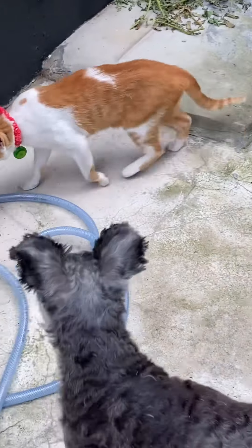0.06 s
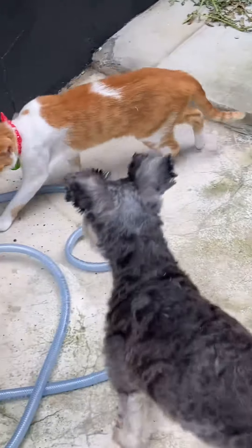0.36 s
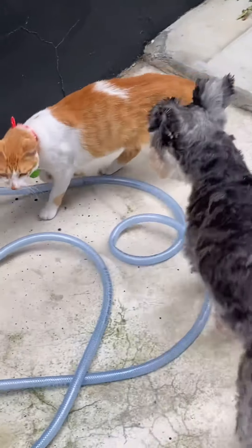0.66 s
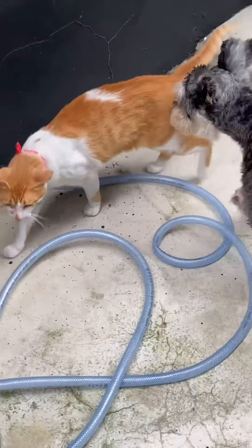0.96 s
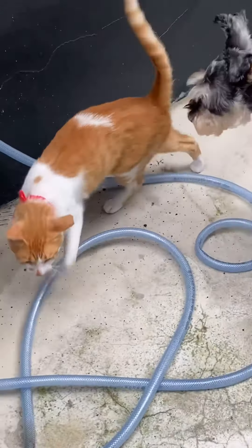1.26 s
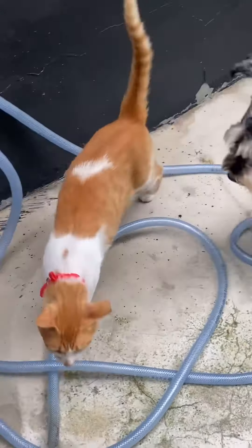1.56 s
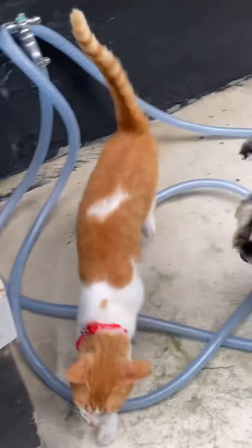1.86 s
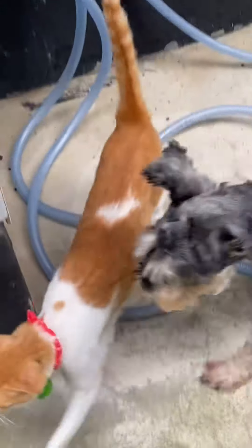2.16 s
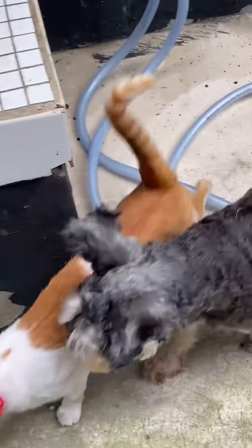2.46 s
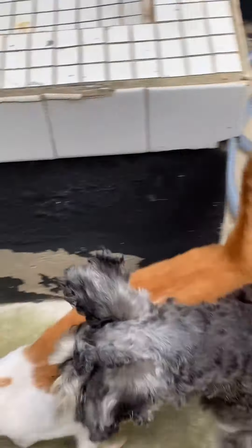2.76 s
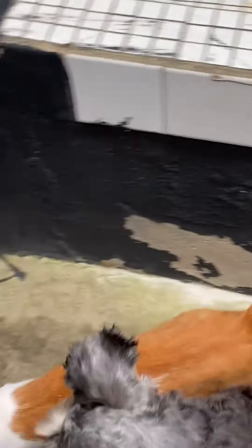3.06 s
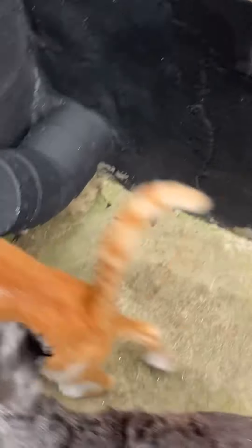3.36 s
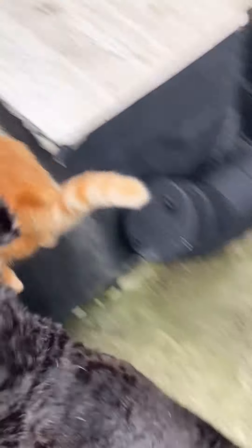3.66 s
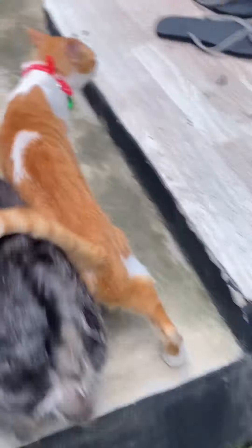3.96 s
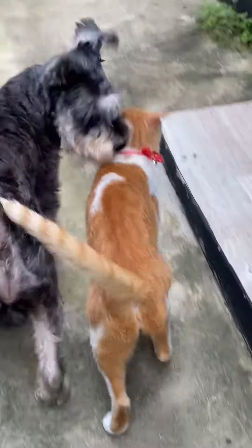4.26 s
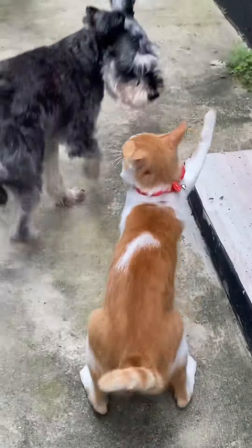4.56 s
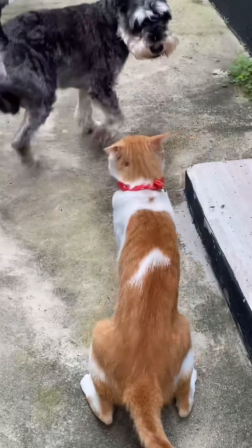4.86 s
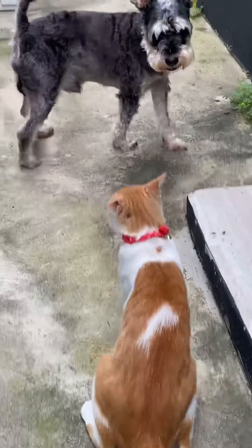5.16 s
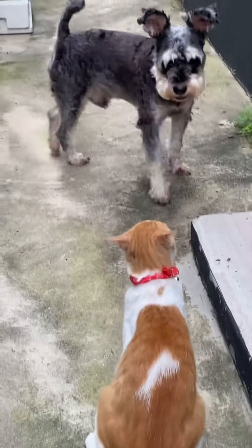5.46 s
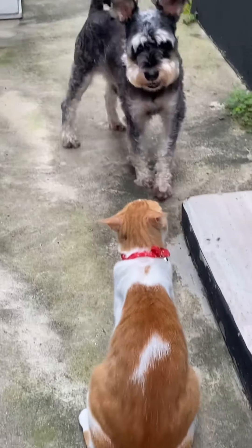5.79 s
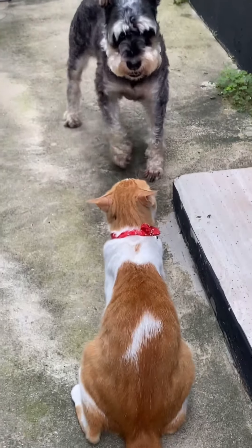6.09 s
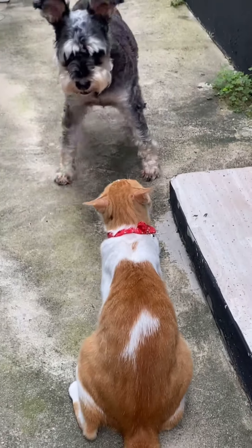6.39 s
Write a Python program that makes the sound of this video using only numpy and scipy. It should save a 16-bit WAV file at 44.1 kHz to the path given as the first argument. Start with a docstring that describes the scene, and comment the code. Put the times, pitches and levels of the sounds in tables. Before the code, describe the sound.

Over a low outdoor rumble and hum, claws tick, paws scuff and a collar bell tinkles faintly as a cat and dog tussle.

```python
"""Cat and dog scuffling in a yard

A cat with a collar bell and a small dog scuffle in a walled concrete yard. Impacts make the claws tick,
the bell tinkle and a garden hose knock; stick-slip friction makes the paws scuff, the hose drag and
something scrape sharply once as the dog shoves the cat along. The walls return a short reverberation.
A bird chirps once, and under it all lie a low rumble, a machine's hum and the outdoor air."""
import sys
import numpy as np
from scipy import signal
from scipy.fft import rfft, irfft, next_fast_len
from scipy.io import wavfile

SR = 44100
rng = np.random.default_rng(int(sys.argv[2]) if len(sys.argv) > 2 else 0)


def wrap_up_sound(samples):
    """Save the sound to the file named by the first command line argument, as 16-bit audio."""
    columns = np.atleast_2d(samples).T
    # keep every value between -1 and 1, then stretch to whole-number steps
    tamed = np.clip(columns, -1, 1)
    steps = np.round(tamed * 32767).astype(np.int16)
    wavfile.write(sys.argv[1], SR, steps)


N = 292378
TIME = np.arange(N) / SR
SIZE = next_fast_len(N, real=True)
FREQS = np.maximum(np.arange(SIZE // 2 + 1) * SR / SIZE, 1)

# Levels in all tables are relative: each source applies its own gain.
# sharp ticks on concrete, mostly claws, also the hose's knock and snaps in the scrape:
# start_s, tick_db, midrange_db
TICKS = [(0.2088, -34, -65), (0.46, -49, -54), (0.4713, -40.5, -49), (0.5015, -44.5, -48.5),
         (0.7377, -34.5, -61), (0.976, -43.5, -63), (1.019, -31, -48), (1.316, -42, -65),
         (1.603, -37, -40.5), (2.174, -32, -49), (2.53, -33.5, -48), (2.707, -43.5, -50), (2.811, -35, -41),
         (2.8238, -30, -39), (3.1646, -40.5, -54), (3.304, -49, -61), (3.5378, -38, -54), (3.909, -49, -52),
         (4.0375, -38.5, -71), (4.142, -49, -57), (4.4764, -28, -75), (4.6096, -28.5, -65),
         (4.6225, -37, -61), (4.6491, -43, -48), (4.999, -48, -60), (5.1429, -38.5, -64),
         (5.1752, -44, -54), (5.4973, -43.5, -46), (5.8363, -52, -56), (5.9852, -35.5, -54),
         (6.3876, -42, -48), (6.4746, -46, -51.5), (6.5226, -54, -51.5)]
# pellet strikes on the bell, each damped differently by fur: start_s, level_db, t60_s, upper_mode_db
BELL_STRIKES = [(.881, -53, .11, 3), (.92, -53, .08, 9), (.93, -52, .11, 8), (.948, -59, .14, 3),
                (.971, -56, .13, -6), (.995, -59, .15, 2), (1.07, -64, .15, 5), (2.931, -42, .07, -12),
                (3.056, -53, .13, -1), (3.183, -48, .07, -1), (3.278, -61, .1, -8), (3.359, -50, .11, -12),
                (3.368, -45.5, .12, -1), (3.4915, -33.5, .045, -10), (3.506, -50, .09, 5),
                (3.533, -54, .1, -6), (3.554, -44, .1, -6), (3.574, -47, .07, -9), (3.598, -53, .09, -12),
                (4.254, -54, .05, -8), (4.261, -48, .08, 0), (4.31, -49, .09, -20), (4.354, -51, .1, 1),
                (4.364, -44, .07, 1), (4.397, -56, .12, -8), (4.765, -51, .11, -10), (4.785, -53, .1, -5),
                (4.822, -38, .055, -24), (4.845, -49, .09, -24)]
# normal modes of the bell's shell: pitch_hz, level_db
BELL_MODES = [(5772, 0), (5880, -18), (6060, -22), (14298, 0)]


def ticks(tick_gain_db=8, tap_gain_db=18, rebound_s=0.0021, crush_s=.0013, crumble_s=.007):
    """Hard impact: a brief contact, mostly of a claw, ticks, rebounds and crumbles a grain."""
    # spectrum of the impacts: frequency_hz, gain_db
    spectrum = [(6000, 0), (9500, 0), (12500, -2), (15500, -2)]

    def contact(rows):
        hits = strikes(rows, spread_db=.5)
        rebound = from_db(-13) * np.interp(TIME - rebound_s, TIME, hits)
        crush, crumble = (signal.lfilter([1], [1, -np.exp(-1 / (decay_s * SR))], hits + 1e-18)
                          for decay_s in (crush_s, crumble_s))
        grains = grit(12000, spread_db=2.5)
        return hits + rebound + grains * (from_db(-8) * crush + from_db(-27) * crumble)
    tick = cut(contact([(s, db) for s, db, _ in TICKS]), hz=5800, kind="high")
    # heavier contacts add mid-range
    tap = resonate(contact([(s, db) for s, _, db in TICKS]), [(5330, 5100, 0)])
    return colour(from_db(tick_gain_db) * tick + from_db(tap_gain_db) * tap, spectrum)


def scuffs(slide_s=0.019, slide_db=-22, clump_db=1.0):
    """Sliding friction: grit is pushed along in clumps, faintly after each tick, more in a scuff."""
    # short gritty scuffs of paws and, twice, of the hose: start_s, rise_s, length_s, fine_db, coarse_db
    skids = [(0.256, .002, 0.028, -51.5, -69), (0.774, .004, 0.032, -54, -62),
             (1.835, 0.0022, 0.068, -56.5, -62), (1.962, .002, 0.067, -54.5, -59),
             (2.443, .002, 0.034, -60, -65), (2.762, 0.0024, 0.0098, -48, -43),
             (2.907, .01, 0.062, -57, -54.5), (2.982, 0.0013, 0.011, -49.5, -57),
             (3.324, .004, 0.039, -62, -66), (3.465, .008, 0.069, -60, -73),
             (3.571, .002, 0.0093, -52, -49), (3.604, .006, 0.03, -54, -65),
             (3.772, 0.0096, 0.029, -48.5, -55), (4.109, 0.0022, 0.015, -57, -56),
             (4.18, .002, .01, -58, -70), (4.367, 0.0045, 0.016, -50, -59),
             (4.777, 0.0027, 0.034, -51.5, -60), (4.938, 0.00094, 0.0072, -62, -51),
             (4.948, 0.026, 0.079, -58, -64), (5.018, 0.016, 0.022, -50, -50),
             (5.4955, 0.0017, 0.0082, -52.5, -50), (5.84, .001, 0.0063, -65, -61)]
    sand_spectrum = [(500, -22), (2000, 2.5), (4500, 3.5), (9500, 4.5), (15000, -4.5)]
    sand = rms_one(colour(grit(5000, spread_db=2.5), sand_spectrum))
    gravel = rms_one(resonate(grit(5000, spread_db=2.5), [(3640, 1360, 0.16), (5930, 2300, 2)]))
    fine = strokes([(s, slide_s, db + slide_db) for s, db, _ in TICKS], rise_s=0.0015)
    coarse = np.zeros(N)
    for s, rise, length, fine_db, coarse_db in skids:
        push = strokes([(s, length, 0)], rise_s=rise)
        fine += from_db(fine_db) * push
        coarse += from_db(coarse_db) * push
    return (sand * fine + gravel * coarse) * from_db(clump_db * drift(90))


def bell(rise_s=0.0006, detune_hz=8, upper_t60_ratio=1.1, flicker_db=-0.8):
    """Modal vibration: each strike rings the shell's damped modes, the highest lasting longest."""
    age = np.arange(SR // 4) / SR
    out = np.zeros(N + len(age))
    for s, db, t60, upper_db in BELL_STRIKES:
        start = int(s * SR)
        for hz, mode_db in BELL_MODES:
            is_upper = hz > 2 * BELL_MODES[0][0]
            decay = from_db(-60 * age / (t60 * upper_t60_ratio ** is_upper))
            envelope = from_db(db + mode_db + upper_db * is_upper) * (1 - np.exp(-age / rise_s)) * decay
            pitch = hz + detune_hz * rng.standard_normal()
            out[start:start + len(age)] += envelope * np.sin(2 * np.pi * pitch * age)
    return out[:N] * from_db(flicker_db * drift(60))


def pellet(clatter_s=0.016, clatter_db=-17, tumble_db=-17, t60_share=0.2):
    """Repeated impacts: after a strike the pellet rolls on, clattering and keeping the shell ringing."""
    clatter = rms_one(resonate(grit(4300, spread_db=-1), [(7900, 2000, 0.77), (10300, 690, -1.8)]))
    shell = [(BELL_MODES[0][0], 60, 0), (BELL_MODES[-1][0], 70, 2)]
    shimmer = rms_one(resonate(grit(700, spread_db=2), shell))
    rolls = [(s, clatter_s, db + clatter_db) for s, db, _, _ in BELL_STRIKES]
    tumbles = [(s, t60_share * t60, db + tumble_db) for s, db, t60, _ in BELL_STRIKES]
    return clatter * strokes(rolls, rise_s=0.0013) + shimmer * strokes(tumbles, rise_s=.004)


def scrape(rise_s=0.0023, catch_s=0.0087, run_out_s=0.066, run_out_db=-18.5, wander_share=.008):
    """Stick-slip friction: a hard skid catches, excites shifting resonances and dulls as it runs out."""
    # catches of the skid: start_s, level_db
    catches = [(2.792, -34), (2.7992, -29.5), (2.8088, -24), (2.8237, -33.5)]
    # spectrum of the friction noise: frequency_hz, density_db
    spectrum = [(200, -0.5), (350, -3), (600, -5), (950, -6), (1230, -10), (1600, -9), (2150, -3),
                (2900, -6.5), (4000, -8.5), (5000, -14), (5800, -14), (7000, -7), (10000, -21),
                (15000, -28)]
    # resonances of the thing that skids: centre_hz, width_hz, gain_db
    body = [(1450, 117, 2.5), (1840, 46, 0), (2210, 220, 5), (2540, 120, 2), (2780, 210, 4.5),
            (3220, 80, 0), (4020, 310, -3), (5550, 200, -7)]
    grip = strokes([(s, catch_s, db) for s, db in catches], rise_s)
    run_out = strokes([(s, run_out_s, db + run_out_db) for s, db in catches], rise_s)
    broad = rms_one(cut(colour(grit(6000, spread_db=2), spectrum), hz=149, kind="high"))
    dull = cut(broad, hz=4500, kind="low", order=1)
    ringing = rms_one(wander(resonate(grit(7000, spread_db=3), body), wander_share * drift(25)))
    bite_spectrum = [(700, -12), (2200, 5), (4000, 3), (7000, -18), (15000, -25)]
    bite = rms_one(colour(grit(2500, spread_db=-1), bite_spectrum))
    return (from_db(-2) * (broad * grip + from_db(-3) * dull * run_out)
            + from_db(-4) * ringing * (grip + run_out)
            + from_db(-8) * bite * grip ** 2 / grip.max())  # harshest where it grips hardest


def hose_knocks(gain_db=-3):
    """Impact excitation: the hose hits the ground and its heavily damped modes ring briefly."""
    # impacts on the ground: start_s, level_db
    knocks = [(1.5957, -35), (1.602, -30.5), (1.6055, -34), (1.611, -40), (1.6155, -44), (1.6215, -44),
              (1.624, -43), (1.955, -41), (1.971, -41.5), (1.977, -42), (1.99, -41)]
    # modes of the hose: pitch_hz, level_db, t60_s
    modes = [(2780, -7, .012), (3170, -5, .014), (3330, -1, .017), (3800, -14, .008), (4800, -9, .008),
             (5300, -3, .012)]
    ringing = sum(from_db(db + gain_db) * ring(strikes(knocks, spread_db=3.5), hz, t60)
                  for hz, db, t60 in modes)
    return cut(cut(ringing, hz=2400, kind="high", order=4), hz=4800, kind="low")


def hose_squeaks(gain_db=-1):
    """Stick-slip friction: the hose catches, and bursts of slips drive narrow resonances."""
    # catches of the hose: start_s, length_s, level_db
    catches = [(1.843, 0.011, -45.5), (1.856, 0.011, -49), (1.8665, 0.006, -41.5), (1.875, 0.018, -51)]
    # resonances of the squeak: centre_hz, width_hz, gain_db
    body = [(2050, 100, 4.5), (2740, 99, 2), (3490, 115, 3), (4590, 70, 1), (5800, 80, -5)]
    squeak = rms_one(resonate(grit(3100, spread_db=6.0), body))
    return from_db(gain_db) * squeak * strokes(catches, rise_s=0.00055)


def hose_drag(start_s=1.989, attack_s=0.055, hold_s=0.23, release_s=0.072, level_db=-48.5, jerk_db=-1):
    """Sliding friction: sandy concrete excites the hose, whose resonances shift as it bends."""
    # resonances of the sliding hose: centre_hz, width_hz, gain_db
    body = [(1440, 50, 1.5), (1766, 50, 4), (1910, 50, -2), (2110, 110, 0), (2700, 280, -0.5),
            (3900, 90, -7), (4400, 100, -6), (5450, 360, -18)]
    slips = grit(11000, spread_db=3)
    bending = wander(resonate(slips, body), share=0.0125 * drift(9.26))
    hiss = from_db(-15.5) * cut(slips, hz=1307, kind="high")
    sliding = rms_one(cut(bending + hiss, hz=8900, kind="low"))
    sand = rms_one(resonate(grit(1600, spread_db=4.0), [(3180, 780, 2), (10700, 5200, -2)]))
    pull = ramp(start_s, attack_s) - ramp(start_s + attack_s + hold_s, release_s)
    return from_db(level_db + jerk_db * drift(45)) * pull * (sliding + from_db(-12) * sand)


def puffs():
    """Resonant filtering: three resonances make noise bursts soft and hollow as the dog steps up."""
    # bursts of noise: start_s, length_s, level_db
    bursts = [(5.768, 0.013, -45.5), (5.797, 0.019, -56), (6.028, 0.031, -49.5), (6.044, 0.043, -50)]
    # hollow resonances: centre_hz, width_hz, gain_db
    body = [(720, 82, -1), (1164, 110, -8), (1600, 146, -11.5)]
    return rms_one(resonate(rng.standard_normal(N), body)) * strokes(bursts, rise_s=0.0012)


def rustle(level_db=-69, patchy_db=3):
    """Light friction: fur and loose grit stir faintly all the while."""
    spectrum = [(1000, 14), (3000, 0.89), (5500, 10.5), (9000, 3.8), (15000, 7.5)]
    grains = colour(grit(2500, spread_db=3.5), spectrum)
    return from_db(level_db) * rms_one(grains * from_db(patchy_db * drift(30)))


def yard(x, gain_db=-6, first_wall_s=0.0087, t60_s=.29):
    """Reverberation: reflections from walls and ground merge into an exponentially decaying tail."""
    age = TIME - first_wall_s
    tail = cut(diffuse(), hz=12000, kind="low", order=1) * (age > 0) * from_db(-60 * age / t60_s)
    tail = tail[:, :SR] / np.sqrt(np.sum(tail ** 2) / 2)
    return from_db(gain_db) * signal.fftconvolve(x[None], tail, axes=1)[:, :N]


def bird(crest_s=.196, length_s=0.029, pitch_hz=4610, fall_hz_per_s=3000, level_db=-58):
    """Frequency sweep: a small bird's chirp is one thin falling tone."""
    pitch = pitch_hz - fall_hz_per_s * (TIME - crest_s)
    return from_db(level_db) * swell(crest_s, length_s) * tone(pitch)


def rumble(pitch_hz=57.27, wander_hz=3.506, wander_db=3, boom_db=-45.5, skirt_db=-48):
    """Amplitude and frequency modulation: a deep boom wanders and swells over broader deep noise."""
    # swells of the rumble: crest_s, length_s, rise_db, pitch_shift_hz
    swells = [(0.114, 0.23, 3, 6), (1.765, 0.075, 7.5, -0.5), (2.357, 0.18, 8, -0.5), (2.813, 0.11, 14, -4),
              (3.022, 0.13, 8.5, -1), (3.18, 0.069, 6.5, 1), (3.428, 0.077, 5.5, -8),
              (3.585, 0.11, 14, -7.5), (3.675, 0.043, 10.5, 0.5), (3.927, 0.18, 9, -2),
              (4.265, 0.05, 6, -0.5), (4.387, 0.074, 10, 4.5), (4.516, 0.056, 7, 5), (4.934, 0.063, 6, 6),
              (5.798, 0.12, 7, -4.5), (6.13, 0.079, 5, -3.5), (6.297, 0.21, 7, -4.5)]
    # spectrum of the deep noise: frequency_hz, density_db
    spectrum = [(15, -14), (27, 1), (35, -13), (46, -1.5), (68, 8), (82, -2.5), (115, -6.5), (160, -15),
                (400, -76), (2000, -100)]
    rise_db = sum(db * swell(s, length) for s, length, db, _ in swells)
    bend_hz = sum(hz * swell(s, length) for s, length, _, hz in swells)
    boom = tone(pitch_hz + bend_hz + wander_hz * drift(16.16)) * from_db(wander_db * drift(20))
    skirt = rms_one(colour(rng.standard_normal(N), spectrum))
    return from_db(boom_db + rise_db) * boom + from_db(skirt_db + 0.46 * rise_db) * skirt


def low_note(start_s=4.42, hold_s=0.33, fade_s=0.062, pitch_hz=67, rise_hz_per_s=9.8, level_db=-37):
    """Pure tone: one deep note stands out of the rumble for a moment, gliding up a little."""
    pitch = pitch_hz + rise_hz_per_s * np.clip(TIME - start_s, 0, hold_s)
    held = ramp(start_s, fade_s) - ramp(start_s + hold_s, fade_s)
    return from_db(level_db) * held * tone(pitch)


def machine(drone_db=-53, fade_start_s=3.3, fade_db_per_s=3.5, whine_hz=2735, whine_db=-75):
    """Line spectrum over noise: wavering hum tones, a thin whine and a resonant drone that fades."""
    # spectral lines of the hum: pitch_hz, level_db, width_hz
    lines = [(136.8, -56, 1.23), (175.7, -51, 1.4)]
    # resonances of the drone: centre_hz, width_hz, gain_db
    body = [(230.3, 14.8, 2), (309.5, 10.5, 0), (345.5, 16, -7.5), (428, 82, -10)]
    # swells of the whine: crest_s, length_s, rise_db
    swells = [(.36, 0.66, 9.2), (1.3, 0.65, 12.2), (3.6, 1.2, 4.8)]

    def line(hz, width_hz):
        waver = from_db(1.1 * drift(7))
        return tone(hz + width_hz * drift(8.5)) * waver
    fade_db = fade_db_per_s * np.maximum(TIME - fade_start_s, 0)
    drone = from_db(drone_db - fade_db) * rms_one(resonate(diffuse(), body))
    hum = sum(from_db(db) * line(hz, width) for hz, db, width in lines)
    rise_db = sum(db * swell(s, length) for s, length, db in swells)
    return hum + drone + from_db(whine_db + rise_db) * line(whine_hz, width_hz=5)


def air(level_db=-48.5):
    """Ambient noise: a steady diffuse outdoor background, strongest in the bass."""
    # spectrum of the background: frequency_hz, density_db
    spectrum = [(90, 0.5), (120, -4), (200, -7), (250, -11), (330, -12), (520, -18), (1000, -15.5),
                (1500, -22), (2600, -27), (4000, -34), (5800, -36), (8000, -43), (11000, -47), (15000, -50)]
    return from_db(level_db) * rms_one(cut(colour(diffuse(), spectrum), hz=70.6, kind="high", order=4))


def diffuse():
    """Diffuse field: stereo noise from all around, its coherence depending on frequency."""
    # side signal against mid: frequency_hz, side_db
    side_levels = [(60, -40), (130, -27), (250, -18), (500, -4.5), (1000, -1), (1700, -4), (2600, -39),
                   (15000, -6.5)]
    mid, side = rng.standard_normal((2, N))
    width = from_db(over_hz(side_levels))
    total = np.sqrt(1 + width ** 2)
    return shape(mid, 1 / total) + shape(side, width / total) * [[1], [-1]]


def grit(per_s, spread_db):
    """Shot noise: tiny slips of uneven size at random times; rms 1."""
    sizes = from_db(spread_db * np.minimum(rng.exponential(1, N), 4)) * rng.choice([-1, 1], N)
    return rms_one(sizes * (rng.random(N) < per_s / SR))


def strikes(rows, spread_db):
    """Impulses: one per row (start_s, level_db), with some chance in its strength."""
    s, db = np.transpose(rows)
    out = np.zeros(N)
    out[np.round(s * SR).astype(int)] = from_db(db + spread_db * rng.standard_normal(len(s)))
    return out


def ring(clicks, hz, t60):
    """Damped oscillator: a unit click sets a sine of height 1 ringing."""
    r, w = from_db(-60 / (t60 * SR)), 2 * np.pi * hz / SR
    return signal.lfilter([0, np.sin(w)], [1, -2 * r * np.cos(w), r * r], clicks + 1e-18)


def resonate(x, body):
    """Parallel resonators (centre_hz, width_hz, gain_db) of alternating sign."""
    out = 0
    for k, (hz, width, db) in enumerate(body):
        r = np.exp(-np.pi * width / SR)
        gain = (-1) ** k * from_db(db) * (1 - r * r) / 2
        out = out + signal.lfilter([gain, 0, -gain], [1, -2 * r * np.cos(2 * np.pi * hz / SR), r * r], x)
    return out


def tone(pitch_hz):
    """Sinusoid of rms 1 whose phase is the integral of its frequency."""
    return np.sqrt(2) * np.sin(2 * np.pi * np.cumsum(pitch_hz) / SR)


def wander(x, share):
    """Time warping: all pitches of x shift by a share that changes over time."""
    return np.interp(TIME + np.cumsum(share) / SR, TIME, x)


def drift(rate_hz, size=4096):
    """Random modulation: low-passed noise of rms 1."""
    hz = np.arange(size // 2 + 1) * SR / N
    slow = irfft(rfft(rng.standard_normal(size)) / (1 + (hz / rate_hz) ** 2), size)
    return np.interp(np.arange(N) * (size - 1) / N, np.arange(size), rms_one(slow))


def strokes(rows, rise_s):
    """Envelope of rows (start_s, length_s, level_db): exponential rise, Gaussian fade."""
    out = np.zeros(N)
    for s, length, db in rows:
        age = np.maximum(TIME - s, 0)
        out += from_db(db) * (1 - np.exp(-age / rise_s)) * np.exp(-np.minimum((age / length) ** 2, 50))
    return out


def swell(crest_s, length_s):
    """Gaussian envelope of height 1."""
    return np.exp(-np.minimum((2 * (TIME - crest_s) / length_s) ** 2, 50))


def ramp(start_s, length_s):
    """Linear rise from 0 to 1."""
    return np.clip((TIME - start_s) / length_s, 0, 1)


def colour(x, points):
    """Filter by a spectrum (frequency_hz, gain_db)."""
    return shape(x, from_db(over_hz(points)))


def shape(x, gain):
    """Filter by a gain for each frequency."""
    return irfft(rfft(x, SIZE) * gain, SIZE)[..., :N]


def cut(x, hz, kind, order=2):
    """Butterworth high- or low-pass."""
    return signal.sosfilt(signal.butter(order, min(hz, .45 * SR), kind, fs=SR, output="sos"), x + 1e-18)


def over_hz(points):
    """Rows (frequency_hz, value) joined on a log-frequency axis."""
    hz, value = np.transpose(points)
    return np.interp(np.log(FREQS), np.log(hz), value)


def from_db(db):
    """Decibels to gain."""
    return 10 ** (np.asarray(db) / 20)


def rms_one(x):
    """Scale to rms 1."""
    return x / np.sqrt(np.mean(x ** 2) + 1e-20)


def scene():
    """Superposition: the animals, what they disturb, the yard's reflections and the background add."""
    sharp = ticks()
    soft = scuffs() + puffs()
    bumped = hose_knocks() + hose_squeaks() + hose_drag() + bell() + pellet() + scrape()
    echoes = yard(from_db(-3) * soft + from_db(-7) * (sharp + bumped))
    return sharp + soft + bumped + echoes + rustle() + bird() + rumble() + low_note() + machine() + air()


def record(dry, cutoff_hz=15800):
    """Stereo pickup: two microphone ports differ in phase and level; a steep low-pass cuts the top."""
    # phase difference between the ports: frequency_hz, left_lead_rad
    phase = [(1800, 0), (2400, .6), (3200, .3), (4000, .1), (4500, .7), (5000, 0), (6000, 1.4), (7000, 3.0),
             (7700, 3.3), (9900, 6.2), (11400, 6.4), (13000, 9.2), (14000, 9.6), (16000, 12.5)]
    # level difference between the ports: frequency_hz, left_minus_right_db
    balance = [(90, 0), (170, -1.35), (270, -3.5), (600, -2.5), (1300, 0.5)]
    half = np.array([[1], [-1]]) / 2
    ports = np.exp(1j * half * over_hz(phase)) * from_db(half * over_hz(balance))
    return cut(shape(dry, ports), cutoff_hz, "low", order=36)


dry = scene()
out = record(dry)
wrap_up_sound(out)
```